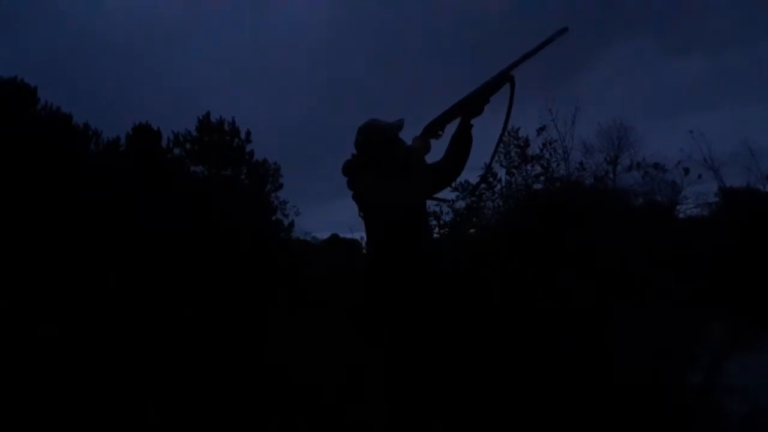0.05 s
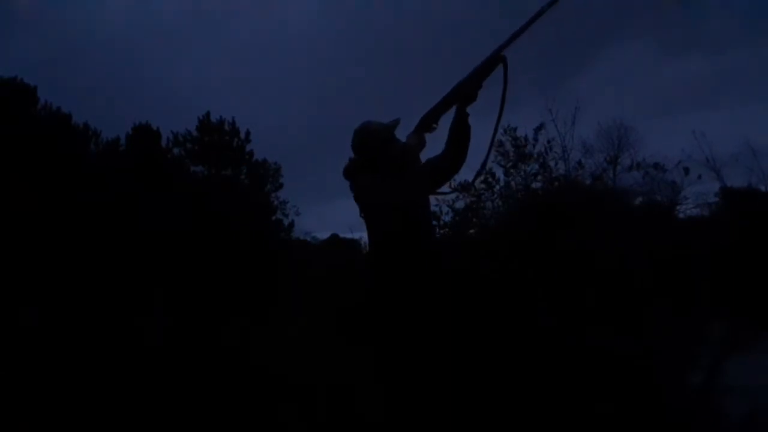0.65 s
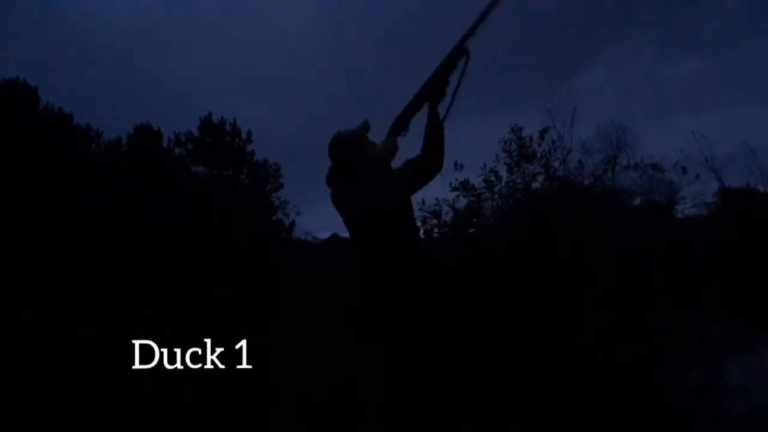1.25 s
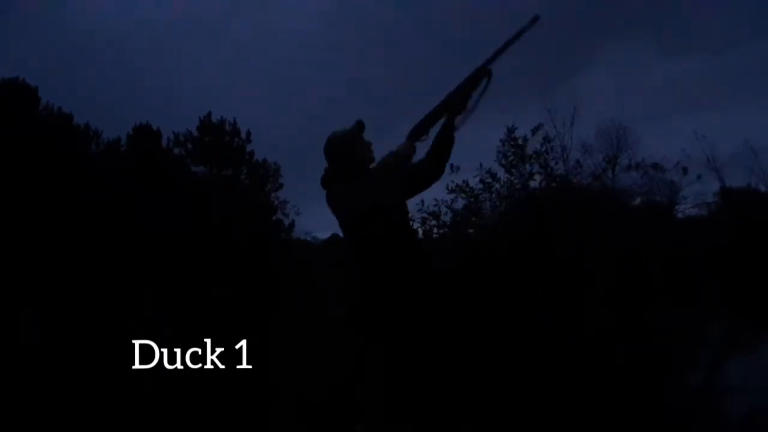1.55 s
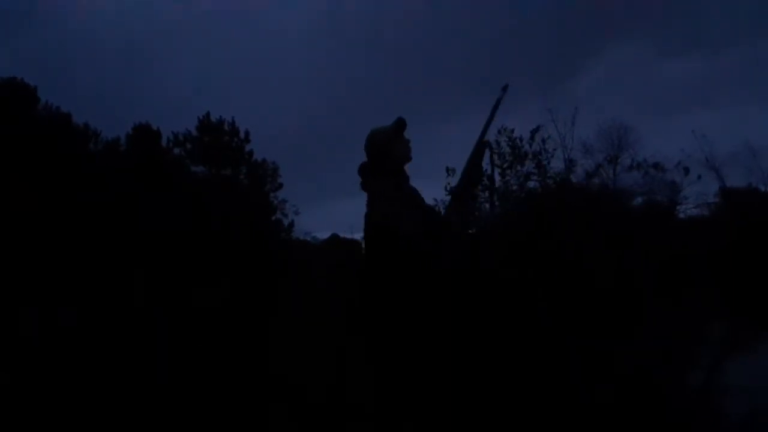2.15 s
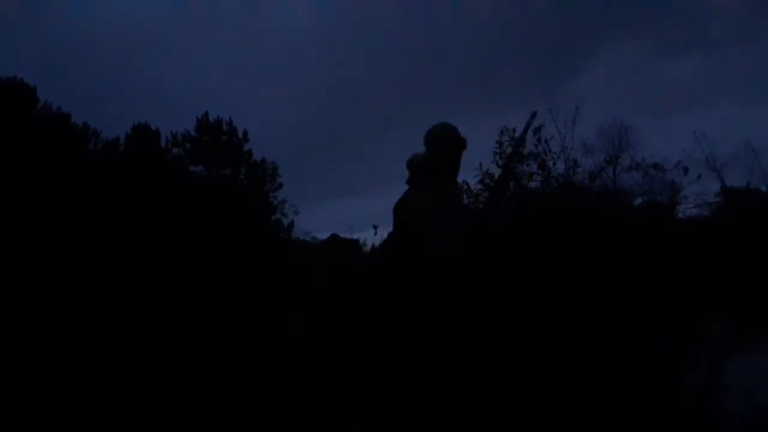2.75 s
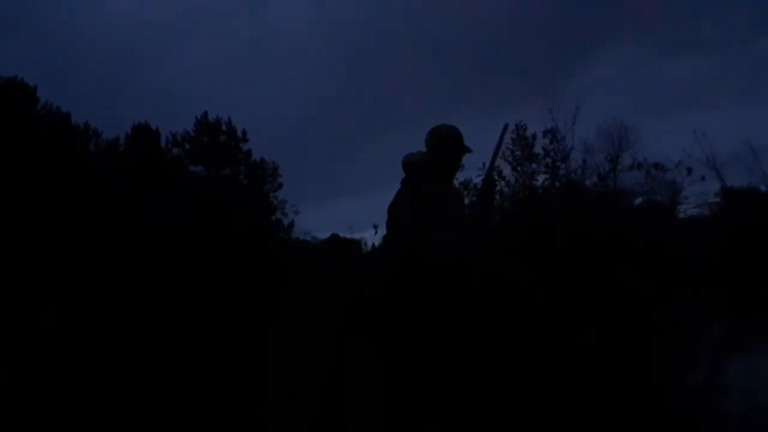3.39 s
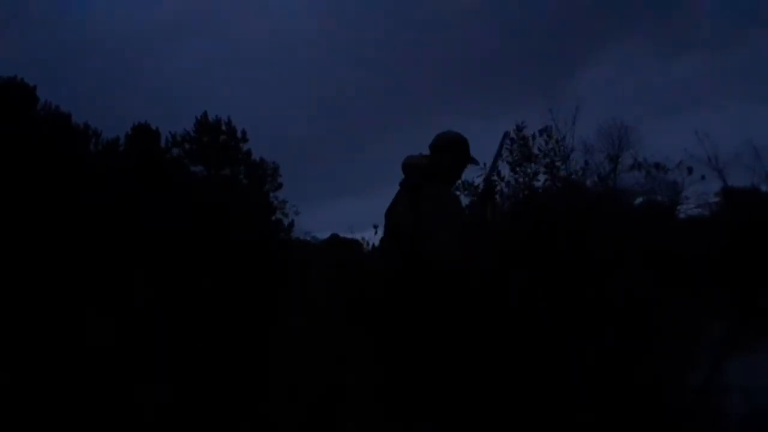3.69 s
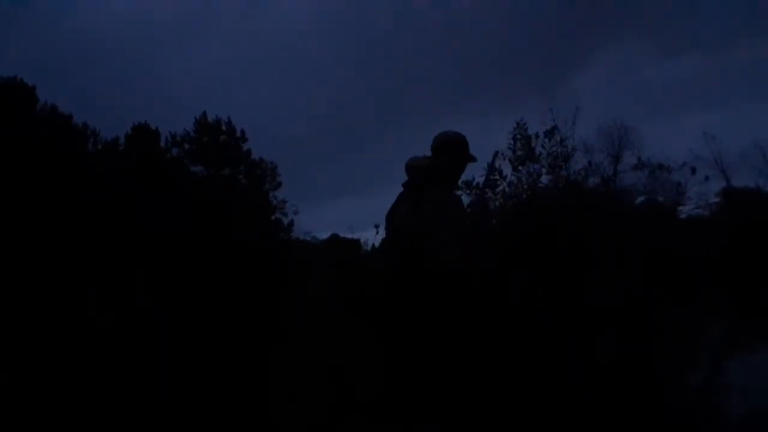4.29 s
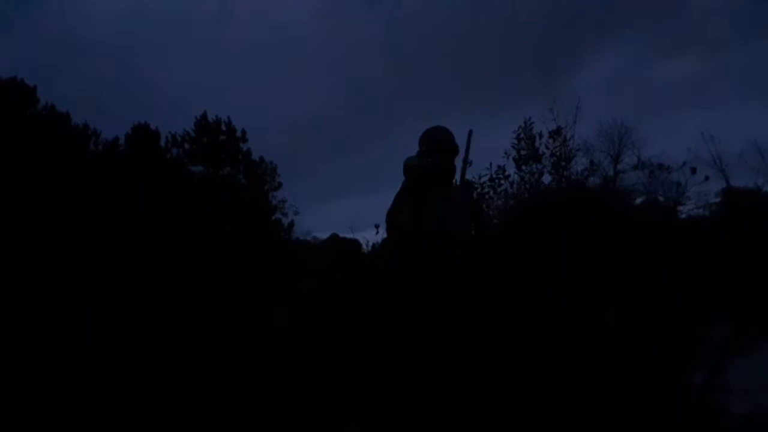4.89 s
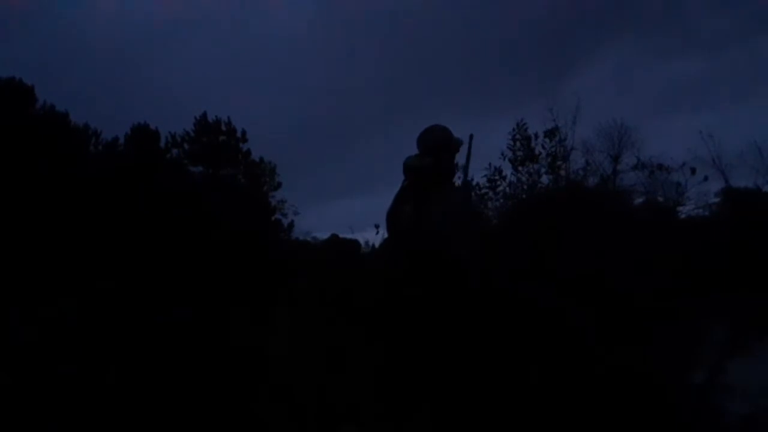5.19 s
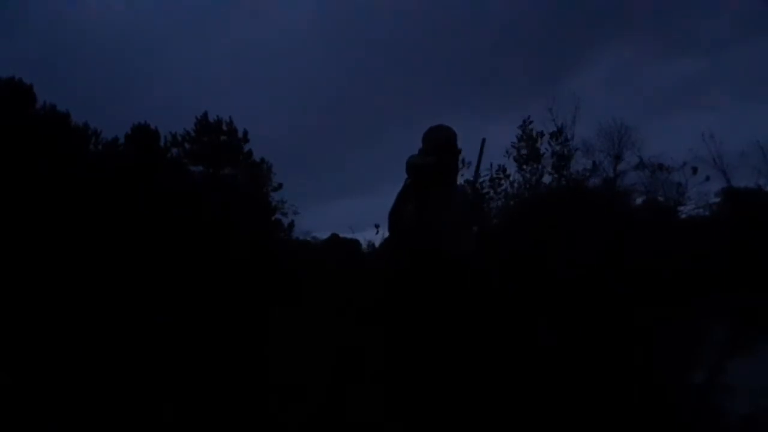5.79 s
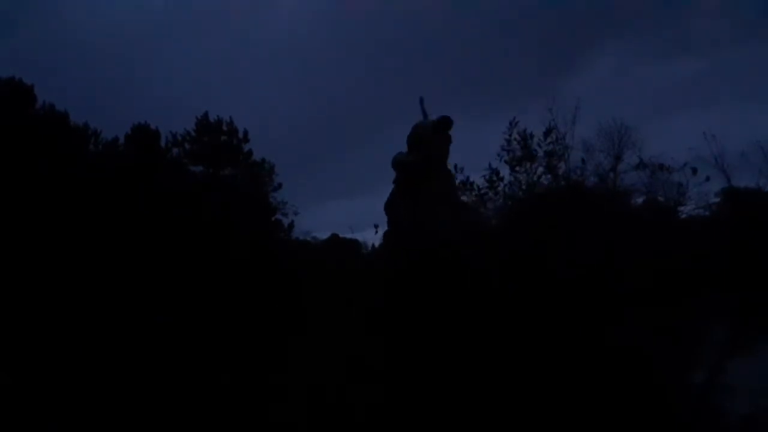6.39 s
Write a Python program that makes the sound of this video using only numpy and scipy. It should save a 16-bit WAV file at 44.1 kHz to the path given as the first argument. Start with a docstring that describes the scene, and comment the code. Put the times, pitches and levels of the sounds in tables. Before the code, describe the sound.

Low wind rumbles on the microphone throughout, with a faint hiss of open country. At the start a far, hollow drone swells and fades, and a small distant bird gives two thin calls. At about 0.9 seconds one loud shotgun blast goes off a few steps away. It crashes through nearby brush, and its echo rolls back from a wooded slope on the right, dying away by about 3 seconds. The overall volume sinks after the blast and creeps back. From 2.4 to 3.3 seconds a sling buckle clinks faintly and a jacket rustles. At 3.7 to 3.9 seconds the gun unlatches and opens with sharp steel clacks. A tick and a short scrape come around 4.6 seconds, then the gun snaps shut at 4.8. Gusts are stronger between 4 and 5.3 seconds, with a soft knock near 5.2. Two light ticks follow around 6 seconds.

```python
"""Wind rumbles and a far drone fades, with two thin bird calls, at dawn. Then a hunter fires one shotgun
blast a few steps from two spaced microphones. It crashes through nearby brush and rolls back from a
wooded slope on the right. A buckle clinks, a jacket rustles, and the gun opens and shuts with sharp
steel clacks. An automatic volume control turns everything down after the blast and lets it creep back."""
import sys
import numpy as np
from scipy import signal
from scipy.fft import rfft, irfft
from scipy.io import wavfile

SR = 44100
rng = np.random.default_rng(int(sys.argv[2]) if len(sys.argv) > 2 else 0)


def log_audio(samples):
    """Write samples as a 16-bit WAV file to the path given in sys.argv[1]."""
    # one column per channel
    frames = np.atleast_2d(samples).T
    # limit to full scale, then quantise
    limited = np.clip(frames, -1, 1)
    pcm = np.round(limited * 32767).astype(np.int16)
    wavfile.write(sys.argv[1], SR, pcm)


N = 284147
TIME = np.arange(N) / SR
SHOT_S = .8688
MIC_GAP_S = 0.00055  # time sound takes from one microphone to the other


def amp(db):
    """Turns decibels into a multiplier."""
    return 10 ** (np.asarray(db) / 20)


def unit_power(x):
    """Scales a signal to an average power of 1."""
    return x / np.sqrt(np.mean(x ** 2) + 1e-20)


def at_pitch(points, hz):
    """Looks up a table's value at any pitch."""
    pitches, values = np.transpose(points)
    return np.interp(np.log(hz + 1), np.log(pitches + 1), values)


def level(rows):
    """Joins time_s, level_db points into a volume curve."""
    return amp(np.interp(TIME, *np.transpose(rows)))


def add(mix, start_s, sound):
    """Mixes in a stereo sound."""
    part = mix[:, round(start_s * SR):][:, :sound.shape[1]]
    part += sound[:, :part.shape[1]]


def band(x, hz, kind, order=2):
    """Keeps what is below hz ("low") or above it ("high")."""
    return signal.sosfilt(signal.butter(order, hz, kind, fs=SR, output="sos"), x)


def colour(x, points, size=4096):
    """Gives noise a tone colour (a level for each pitch) at the same power."""
    db = at_pitch(points, abs(np.fft.fftfreq(size, 1 / SR)))
    log_gain = np.log(amp(np.maximum(db, -100)))
    taps = np.fft.ifft(np.exp(np.conj(signal.hilbert(log_gain)))).real[:size // 2]
    return signal.oaconvolve(x, taps[None] / np.linalg.norm(taps), axes=1)[:, :x.shape[1]]


def arrivals(size, side=0., direct=0., grain_db=0., spread=0.031, clear_hz=0):
    """Stereo noise: a direct share from one side (-1 left, 1 right), the rest from all around."""
    grains = amp(grain_db * np.minimum(rng.exponential(1, size // 16 + 1), 4)).repeat(16)[:size]
    shared, separate, source = rfft(rng.standard_normal((3, size)) * grains)
    hz = np.fft.rfftfreq(size, 1 / SR)
    alike = np.sinc(2 * hz * MIC_GAP_S)
    direct = direct * np.exp(-(2 * np.pi * hz * MIC_GAP_S * spread) ** 2 / 2)  # width blurs the treble
    direct += (1 - direct) * clear_hz ** 2 / (clear_hz ** 2 + hz ** 2 + 1)  # low notes scatter less
    around = np.array([shared, alike * shared + np.sqrt(1 - alike ** 2) * separate])
    aimed = np.array([source * np.exp(-2j * np.pi * hz * side * MIC_GAP_S), source])
    return unit_power(irfft(np.sqrt(direct) * aimed + np.sqrt(1 - direct) * around, size))


def fade(t, fade_s):
    """Dies away by 60 dB every fade_s seconds."""
    return np.exp(-np.log(1000) * t / fade_s)


def swell(size):
    """A quick rise and a slower fall."""
    return np.sin(np.pi * np.linspace(0, 1, size) ** 0.46) ** 2


def wobble(hz, size=N):
    """A random wander, mostly slower than hz."""
    return unit_power(band(rng.standard_normal(size), hz, "low"))


def lumps(depth_db, hz):
    """A volume that wanders at random."""
    return unit_power(amp(depth_db * wobble(hz).clip(-2, 2)))


def through_steel(x, notes):
    """Passes a sound through steel that rings at its own notes."""
    t = TIME[:SR // 6]
    response = signal.unit_impulse(len(t))
    for hz, db, fade_s in notes:
        decay = fade(t, fade_s)
        response += 2 * amp(db) * decay / decay.sum() * np.cos(2 * np.pi * hz * t)
    return signal.oaconvolve(x, response[None] / np.linalg.norm(response), axes=1)


# How hard the wind blows: time_s, level_db (in every table, levels compare one row with another)
WIND_STRENGTH = [(0, -42.5), (.25, -41.5), (.48, -54.5), (1.7, -40.5), (2.1, -43.5), (2.9, -45), (3.2, -48),
                 (3.9, -43), (4.25, -36), (4.75, -38), (5.05, -32.5), (5.36, -47), (5.43, -50), (5.65, -60),
                 (5.78, -40.5), (6.2, -43.5), (6.44, -50)]
# The hardest gusts, the first being the push of the blast: peak_s, level_db, rumble_db
HARD_GUSTS = [(.9, -31, -58), (2.68, -36.5, -44), (3.1, -40.5, -36), (3.29, -46, -42), (3.39, -50, -38),
              (4.182, -29, -44), (4.28, -32, -42), (4.432, -28.5, -43), (4.59, -33, -43),
              (4.94, -32.5, -43), (5.0, -42.5, -37), (5.31, -32, -34), (6.169, -36, -39)]
# Tone colours of the gusts and the rumble: pitch_hz, level_db
GUST_COLOUR = [(12, -59), (20, -25), (35, -19), (65, 1), (90, 1.5), (140, -1), (220, -10.5), (300, -17.5),
               (450, -30.5), (700, -37), (1100, -83)]
RUMBLE_COLOUR = [(12, -27), (25, -19), (45, 3), (70, -2), (120, -5), (300, -50), (800, -82)]

def wind(gust_half_s=0.028):
    """Swirls and gusts hit each microphone almost separately, over a rumble that follows the wind."""
    strength = level(WIND_STRENGTH)
    pushes, deep = 0, 0
    for peak_s, db, rumble_db in HARD_GUSTS:
        push = np.exp(-((TIME - peak_s) / gust_half_s) ** 2)
        pushes += amp(db) * push
        deep += amp(rumble_db) * push
    noise = rng.standard_normal((2, N)) + .5 * rng.standard_normal(N)
    each_mic = np.array([lumps(depth_db=3, hz=30.3), lumps(depth_db=2, hz=30.7)])
    force = each_mic * np.hypot(strength * lumps(depth_db=3.8, hz=14), pushes)
    gusts = amp(1.5) * unit_power(colour(noise, GUST_COLOUR)) * force
    flutter = unit_power(band(band(rng.standard_normal((2, N)), 400, "low", order=3), 194, "high"))
    flutter *= amp(-47.5) * np.minimum(force / amp(-30), 1.5) ** 1.6  # hard gusts flutter most
    follows = (strength / np.exp(np.log(strength).mean())) ** 0.35
    rumble = np.hypot(amp(-51.5) * follows, deep) * colour(rng.standard_normal((2, N)), RUMBLE_COLOUR)
    return gusts + flutter + rumble


# Loudness of the breeze in far trees, and of the hiss: time_s, level_db
BREEZE_CURVE = [(0, -0.5), (2.3, 7), (3.05, 0), (3.4, 4.5), (3.65, 1), (4.2, -1), (4.8, 2), (5.15, -1),
                (5.6, -2.5), (6.1, 3.5), (6.44, 0.5)]
HISS_CURVE = [(0, -50.5), (.85, -50.5), (2.05, -52), (2.6, -52), (3.35, -50.5), (4.2, -51.5), (4.8, -49.5),
              (5.1, -51.5), (5.7, -54), (6.15, -51), (6.44, -51.5)]
# Their tone colours: pitch_hz, level_db
MURMUR_COLOUR = [(59, -25), (100, -18.5), (287, -21), (415, -19.5), (506, -18), (921, -16.5), (1140, -24.5),
                 (1330, -24.5), (3000, -39.5), (3900, -74.5), (6600, -120)]
HISS_COLOUR = [(800, -21), (1500, -7), (2300, -11.5), (3800, -9.5), (6200, -9.5), (9500, -12),
               (12000, -8.5), (16200, -11)]

def air():
    """Open country murmurs with the breeze, under a fine hiss that starts out brighter."""
    murmur = amp(-51.5) * level(BREEZE_CURVE) * colour(arrivals(N), MURMUR_COLOUR)
    hiss = level(HISS_CURVE) * colour(rng.standard_normal((2, N)), HISS_COLOUR)
    sheen = band(rng.standard_normal((2, N)), 8900, "high", order=3)
    return murmur + hiss + sheen * level([(0, -54), (.5, -52), (.85, -51.5), (1.2, -75)])


# Tone colour of the drone: pitch_hz, level_db
HOLLOW_COLOUR = [(240, -70), (400, -43), (419, -26), (522, -52), (587, -3.5), (665, -9), (1030, -5),
                 (1080, -3), (1470, -14.5), (2600, -26.5), (3380, -45), (5720, -120)]
# Thin tones inside it: start_s, end_s, pitch_hz, level_db
DRONE_TONES = [(-.04, .19, 1108, -44.5), (.21, .46, 1111, -43), (-.1, .85, 1109, -55), (.03, .45, 856, -52),
               (.44, .72, 861, -52), (.29, .46, 598, -55), (.58, .79, 581, -51.5), (-.05, .22, 323, -58),
               (.55, .85, 323, -56), (.25, .5, 985, -56), (.2, .65, 1288, -59)]

def drone(peak_s=0.4, rise_db_per_s=4.5, fall_db_per_s=18.5):
    """A far, hollow drone with wavering tones swells, fades and ends under the shot."""
    drop_db = np.maximum(rise_db_per_s * (peak_s - TIME), fall_db_per_s * (TIME - peak_s))
    out = amp(-45 - drop_db) * colour(arrivals(N, side=0.098, direct=0.72), HOLLOW_COLOUR)
    for start_s, end_s, hz, db in DRONE_TONES:
        pitch_hz = hz * (1 + 0.0022 * wobble(15))
        progress = np.clip((TIME - start_s) / (end_s - start_s), 0, 1)
        arch = np.sin(np.pi * progress).clip(0) ** 0.61
        out += amp(db + 2.5) * arch * np.sin(2 * np.pi * np.cumsum(pitch_hz) / SR)
    return out * np.interp(TIME, [.85, .95], [1, 0])


# Calls of a small, far bird: start_s, length_s, level_db
BIRD_CALLS = [(.018, .04, -63), (.208, .075, -65)]

def bird(top_hz=7460, slide_hz=2100, slide_s=0.0087, blur_hz=450):
    """Two thin calls slide up to their pitch, blurred by distance."""
    out = np.zeros((2, N))
    for start_s, length_s, db in BIRD_CALLS:
        t = TIME[:int(length_s * SR)]
        hz = top_hz - slide_hz * np.exp(-t / slide_s) + blur_hz * wobble(600, len(t))
        cycles = np.cumsum(hz) / SR + rng.random((2, 1)) / 4
        add(out, start_s, amp(db) * swell(len(t)) * np.sin(2 * np.pi * cycles))
    return out


# The shot and its bounces off nearby bushes: start_s, level_db, fade_s
SHOT_CRACKS = [(0.8627, -25, 0.034), (0.8690, -7.3, 0.085), (0.8747, -11.5, 0.065), (0.8903, -13, 0.14),
               (0.8966, -12, 0.14), (0.9416, -14.5, 0.03), (0.9765, -24, 0.02)]
# How long each pitch lingers in the brush: pitch_hz, fade_s
BRUSH_FADES = [(100, 5.1), (500, 1.8), (2000, 0.66), (5000, 0.8), (9000, 0.59), (15000, 0.39)]
# Tone colour of the shot: pitch_hz, level_db
BLAST_COLOUR = [(30, -48), (60, -22), (130, -17), (310, -2.5), (600, 1), (900, 2), (2000, 1), (3200, -0.5),
                (4700, -1.5), (7000, -3.5), (9500, -9.5), (11200, -3.5), (13000, -1.5), (15000, -4),
                (16200, -16)]

def blast(twig_hz=1700):
    """The muzzle cracks in a dense burst; twigs scatter it into a tail whose treble dies first."""
    out, t = np.zeros((2, N)), TIME[:SR]
    for start_s, db, fade_s in SHOT_CRACKS:
        noise = rng.standard_normal((2, SR))
        aimed = amp(-7.5) * arrivals(SR, side=0.31, direct=0.72, grain_db=4)
        add(out, start_s, amp(db) * fade(t, fade_s) * unit_power(noise + aimed))
    hz, age, bands = signal.stft(arrivals(SR, side=0.34, direct=0.12, grain_db=1.5), SR, nperseg=256)
    bands *= fade(age, at_pitch(BRUSH_FADES, hz)[:, None])
    tail = signal.istft(bands, SR, nperseg=256)[1][:, :SR]
    tail = band(tail, twig_hz, "high", order=1)  # twigs are too thin to scatter low notes
    add(out, SHOT_S, amp(-13) * tail * (1 - fade(t, 0.042)))
    return colour(out, BLAST_COLOUR)


def ground_growl():
    """The open ground keeps a low growl going between the first echoes."""
    out, t = np.zeros((2, N)), TIME[:SR]
    growl = unit_power(band(band(arrivals(SR), 380, "low", order=3), 130, "high"))
    add(out, SHOT_S, amp(-37) * growl * (1 - fade(t, 0.1)) * fade(t, 1.3))
    return out


# Separate echoes: start_s, level_db, half_length_s, top_hz, side (-1 left, 1 right)
TREE_ECHOES = [(0.936, -22, .009, 2200, 0.54), (0.989, -27, 0.006, 900, 0.034), (1, -22, 0.024, 5930, 0.35),
               (1.0102, -19, 0.0049, 1500, 0.25), (1.021, -28, 0.0072, 700, 0.12),
               (1.034, -26, .018, 4000, 0.27), (1.051, -26, 0.008, 960, -0.34),
               (1.077, -24, 0.022, 4000, 0.31), (1.104, -30.5, .012, 900, -0.23),
               (1.116, -26.5, .011, 3500, -.8), (1.158, -38, .015, 2400, -.8),
               (1.2286, -24, 0.006, 2730, 0.97), (1.249, -24, 0.013, 3680, 0.96),
               (1.274, -25.5, 0.015, 4100, 0.87), (1.29, -28, .01, 480, .9), (1.319, -27, .007, 702, 1),
               (1.356, -25.5, .012, 3480, 0.81), (1.393, -20, 0.019, 570, 0.82),
               (1.436, -27, .014, 1800, 0.63), (1.475, -25.5, .03, 1200, 0.55),
               (1.536, -20.5, .016, 700, 0.65), (1.595, -25, .014, 600, .85), (1.648, -22, 0.011, 515, 1),
               (1.698, -23, .014, 550, .85), (1.788, -25.5, 0.015, 420, 1), (1.845, -26, .02, 420, .85),
               (1.971, -31, 0.01, 410, .85), (2.308, -38, 0.018, 417, .85)]
# Tone colour of a hard bank's dull knock: pitch_hz, level_db
KNOCK_COLOUR = [(60, -24), (130, -5), (250, 0), (380, -1), (530, 2), (640, -1), (850, -16), (1500, -31),
                (3000, -60)]

def echoes(knock_s=1.0748):
    """Trees and banks send back dull copies of the shot; a narrow ring lingers between them."""
    out, t = np.zeros((2, N)), TIME[:SR // 8]
    for start_s, db, half_s, top_hz, side in TREE_ECHOES:
        size = int(2 * half_s * SR)
        burst = arrivals(size, side=side, direct=0.81, grain_db=1.5, spread=0.051, clear_hz=905)
        burst = band(band(burst, top_hz, "low", order=3), 227, "high", order=3)
        add(out, start_s, amp(db - 4) * unit_power(burst * swell(size)))
    shape = (1 - fade(t, 0.014)) * fade(np.maximum(t - .008, 0), 0.018)
    knock = colour(arrivals(len(t), side=0.49, direct=0.83) * shape, KNOCK_COLOUR)
    add(out, knock_s, amp(-27) * unit_power(knock))
    ring_colour = [(900, -30), (1650, -7), (2050, 0), (2600, -7), (4000, -24)]  # pitch_hz, level_db
    ring = colour(arrivals(N, side=-.8, direct=.5), ring_colour)
    return out + amp(-38) * ring * np.interp(TIME, [1., 1.1, 1.22, 1.35], [0, 1, 1, 0])


# Wooded banks, near to far: start_s, rise_s, fade_s, boom_db, crackle_db
WOODED_BANKS = [(1.08, 0.025, 0.7, -40, -42), (1.241, 0.029, 0.56, -26, -27),
                (1.348, 0.048, 0.33, -28, -27), (1.425, 0.011, 1.8, -23.5, -28.5),
                (1.45, 0.19, 1.23, -23, -28.5), (2.28, 0.022, 0.97, -44, -50)]
# Tone colour of their answer: pitch_hz, level_db
SLOPE_COLOUR = [(45, -45), (80, -29), (130, -12), (210, -1), (380, -1.5), (650, -8.5), (1100, -6),
                (1450, -18.5), (1900, -12), (2450, -21), (2850, -16.5), (3300, -25.5), (4000, -21),
                (5200, -30), (7000, -36), (12000, -62)]

def slope_roll(blend_s=0.9):
    """Thousands of trunks answer in a rolling echo; the air takes more treble from the later ones."""
    noise = colour(arrivals(4 * SR, side=0.85, direct=0.85, grain_db=2.5, spread=0.068), SLOPE_COLOUR)
    hz, time_s, bands = signal.stft(noise, SR, nperseg=256)
    lost_db = 3 * np.clip(hz[:, None] / 1000 - 2, 0, 7) * (np.clip(time_s, 1.3, 2.2) - 1.5)
    wave = np.zeros((2, N))
    add(wave, 0, signal.istft(bands * amp(-lost_db), SR, nperseg=256)[1])
    boom_power, crackle_power = 0, 0
    for start_s, rise_s, fade_s, boom_db, crackle_db in WOODED_BANKS:
        rise = np.clip((TIME - start_s) / rise_s, 0, 1)
        age = np.maximum(TIME - start_s - rise_s, 0)
        boom_power += (amp(boom_db) * rise * fade(age, fade_s)) ** 2
        crackle_power += (amp(crackle_db) * rise * fade(age, 0.86 * fade_s)) ** 2
    boom = amp(5) * band(wave, 740, "low", order=3) * np.sqrt(boom_power)
    crackle = amp(11) * band(wave, 1160, "high", order=3) * np.sqrt(crackle_power)
    # Clumps of trees make the roll uneven; it smooths out as more echoes overlap.
    unevenness = np.exp(-np.maximum(TIME - SHOT_S, 0) / blend_s)
    return (boom + crackle) * lumps(depth_db=2.5, hz=31) ** unevenness


# Faint clinks: start_s, level_db, half_rattle_s, top_hz, bottom_hz
BUCKLE_CLINKS = [(2.419, -55, .018, 11000, 4000), (2.701, -50.5, .011, 12000, 5500),
                 (2.898, -56, .014, 15000, 8500), (2.975, -54, .018, 15000, 8500),
                 (3.256, -51, .016, 6500, 4000)]
# Notes the buckle rings at: pitch_hz, level_db, fade_s
BUCKLE_NOTES = [(6050, 19, .014), (8550, 25, .03), (14150, 15, .012)]

def buckle():
    """Quick, light touches ring the buckle of the gun's sling."""
    out = np.zeros((2, N))
    for start_s, db, half_s, top_hz, bottom_hz in BUCKLE_CLINKS:
        size = int(2 * half_s * SR)
        touches = np.pad(arrivals(size) * swell(size), ((0, 0), (0, size)))
        clink = through_steel(touches, BUCKLE_NOTES)[:, :2 * size]
        clink = band(band(clink, top_hz, "low"), bottom_hz, "high", order=3)
        add(out, start_s, amp(db - 3) * unit_power(clink))
    return out


# Jacket rustles and soft knocks: start_s, level_db, half_length_s
JACKET_RUSTLES = [(2.604, -43.5, 0.11), (2.754, -48, 0.051), (2.838, -41.5, 0.048), (3.075, -52, 0.039),
                  (3.204, -55, 0.047)]
STANCE_KNOCKS = [(2.674, -48, 0.015), (5.17, -40, .008)]
# Tone colour of the cloth: pitch_hz, level_db
CLOTH_COLOUR = [(600, 0), (1400, -12), (2000, 2), (2450, -6.5), (3000, -13), (5000, -32), (12000, -41)]

def hunter_moves():
    """The jacket rustles as the gun is lowered, and a shift of stance knocks softly."""
    out = np.zeros((2, N))
    for start_s, db, half_s in JACKET_RUSTLES:
        size = int(2 * half_s * SR)
        add(out, start_s, amp(db) * swell(size) * colour(arrivals(size, grain_db=3.5), CLOTH_COLOUR))
    for start_s, db, half_s in STANCE_KNOCKS:
        size = int(2 * half_s * SR)
        add(out, start_s, amp(db) * swell(size) * unit_power(band(arrivals(size), 900, "low", order=3)))
    return out


# Steel hitting steel: start_s, level_db, body_db (higher is duller), fade_s, state
GUN_CLACKS = [(3.7063, -18.5, -24, 0.025, "latch"), (3.7098, -4, -12.5, 0.013, "latch"),
              (3.732, -22, -1, 0.03, "latch"), (3.808, -21.5, -11, 0.047, "open"),
              (3.821, -19.5, -8, 0.041, "open"), (3.841, -15, -14, 0.042, "open"),
              (3.847, -12, -10, 0.06, "open"), (3.854, -10.5, -4, 0.056, "open"),
              (3.863, -4, -12, 0.042, "open"), (3.883, -20, -30, 0.039, "open"),
              (4.729, -15.5, -6, 0.084, "shut"), (4.751, -18.5, -14, 0.12, "shut"),
              (4.764, -9.5, -10.5, 0.072, "shut"), (4.772, -8.5, -3.5, 0.042, "shut"),
              (4.7797, -0.5, -7.5, 0.028, "shut"), (4.783, -11, -27, 0.046, "shut"),
              (4.793, -12.5, -26, 0.041, "shut")]
# Steel sliding on steel: start_s, level_db, half_length_s
GUN_SCRAPES = [(4.635, -45, 0.017), (4.656, -41.5, 0.03), (4.694, -42, 0.031)]
# Notes of the latch, and of the gun when open and shut: pitch_hz, level_db, fade_s
LATCH_NOTES = [(650, 6, 0.027), (1220, -2, 0.016), (1880, 3, 0.015), (2820, 6, 0.02), (3980, 3, 0.029),
               (4670, 0, .025), (5530, -7, 0.032), (13600, 8, .02), (14500, 6, .012)]
OPEN_NOTES = [(545, 2, 0.017), (953, 5.7, 0.016), (1420, 6.6, 0.02), (1850, 1, 0.047), (2440, 4.3, .02),
              (3180, 3.5, 0.015), (4110, 5, .025), (4610, 5.7, 0.014), (5330, 3.3, 0.041),
              (6230, 5.6, 0.046), (7680, 3.5, 0.011)]
SHUT_NOTES = [(455, 2.7, 0.023), (620, 3.6, 0.053), (730, 4.5, 0.03), (930, 3.5, 0.02), (1270, 5.5, 0.019),
              (1656, 5.3, 0.028), (2040, 2.7, 0.025), (2840, 6.6, 0.035), (3750, 7.5, 0.028),
              (4330, 1.5, 0.04), (4930, 6.3, .025), (5440, 3.6, 0.01), (7170, 1.5, 0.019),
              (10300, 5, 0.028)]
# Tone colour of the moving parts: pitch_hz, level_db
GUN_COLOUR = [(120, -33), (200, -21), (400, -10), (620, -8), (760, -7.5), (950, -1), (1400, -3.5),
              (2600, -6), (5100, -4), (6000, -8), (7300, -3), (9100, -10), (10400, -6), (16000, -10)]

def gun_action():
    """Steel parts slide and slam home; the gun rings differently as it opens and shuts."""
    out, t = np.zeros((2, N)), TIME[:SR // 5]
    notes = {"latch": LATCH_NOTES, "open": OPEN_NOTES, "shut": SHUT_NOTES}
    for start_s, db, body_db, fade_s, state in GUN_CLACKS:
        rise_s = 0.00052 * 2 ** (-db / 8)  # softer hits start more slowly
        rise = 1 - np.exp(-t / rise_s)
        crash = arrivals(len(t), side=0.13, direct=0.49, grain_db=0.5, spread=0.021, clear_hz=1700)
        crash *= rise * (fade(t, fade_s) + amp(-15.5) * fade(t, 0.14))  # brush adds a short tail
        body = band(crash, 5600, "low", order=1)
        hit = amp(0.86 * body_db + 4.5) * body + amp(-.5 * body_db - 5) * (crash - body)
        add(out, start_s, through_steel(amp(db - 5) * hit, notes[state]))
        # Each hit also sets the low notes clanging, until the hands damp them.
        ring = sum(amp(note_db) * fade(t, ring_s) * np.sin(2 * np.pi * (hz * t + rng.random()))
                   for hz, note_db, ring_s in notes[state])
        clang = band(ring, 1900, "low") * rise * fade(t, .05)
        add(out, start_s, amp(db + body_db - 21) * np.array([clang, clang]))
    for start_s, db, half_s in GUN_SCRAPES:
        size = int(2 * half_s * SR)
        scrape = amp(db) * swell(size) * arrivals(size, grain_db=3.5)
        add(out, start_s, through_steel(scrape, OPEN_NOTES))
    return colour(out, GUN_COLOUR)


# Light ticks: start_s, level_db, fade_s
LIGHT_TICKS = [(4.5641, -21.5, 0.01), (6.0045, -32.5, 0.0071), (6.122, -41, .03)]
# Their tone colour: pitch_hz, level_db
TICK_COLOUR = [(500, -43), (1100, -1), (1900, 9.5), (3200, -2.5), (4300, 5.5), (6000, -10), (8200, -4),
               (9500, -40), (16000, -23)]

def ticks():
    """A catch or a shell ticks lightly, with a short tail."""
    out, t = np.zeros((2, N)), TIME[:SR // 5]
    for start_s, db, fade_s in LIGHT_TICKS:
        tick = arrivals(len(t), grain_db=0.5) * (fade(t, fade_s) + amp(-9) * fade(t, 0.08))
        add(out, start_s, amp(db - 3.5) * colour(tick, TICK_COLOUR))
    return out


def scene():
    """Adds up all the sounds; echoes, wind and air get a small lift on the left."""
    outdoors = (echoes() + slope_roll() + wind() + air()) * amp([[.8], [-.8]])
    hunter = blast() + ground_growl() + gun_action() + ticks() + buckle() + hunter_moves()
    return outdoors + hunter + drone() + bird()


def record(dry, threshold_db=-35.5, cut_share=0.53, memory_s=0.5, ceiling=1.05, top_hz=16150):
    """The volume sinks under loud sound and creeps back; peaks are rounded and the top treble is cut."""
    keep = np.exp(-1 / (memory_s * SR))
    middle = band(band(dry, 200, "high"), 2000, "low")
    recent_power = signal.lfilter([1 - keep], [1, -keep], (middle ** 2).mean(0))
    excess_db = np.maximum(10 * np.log10(recent_power + 1e-12) - threshold_db, 0)
    turned_down = dry * amp(-cut_share * excess_db)
    rounded = ceiling * np.tanh(turned_down / ceiling)
    treble_cut = signal.firwin(511, top_hz, window=("kaiser", 9), fs=SR)
    return signal.oaconvolve(rounded, treble_cut[None], "same")


dry = scene()
out = record(dry)
log_audio(out)
```